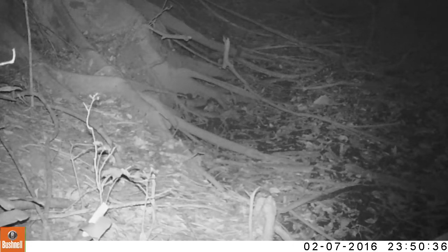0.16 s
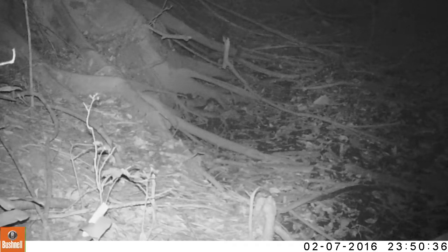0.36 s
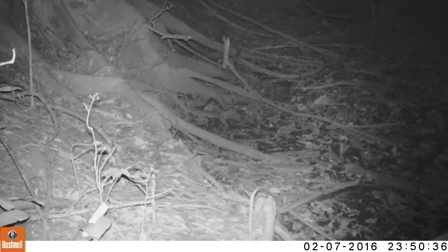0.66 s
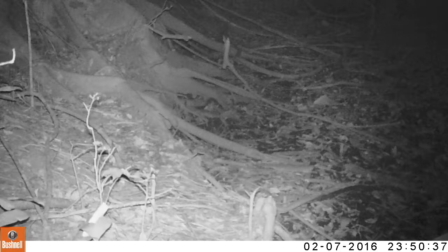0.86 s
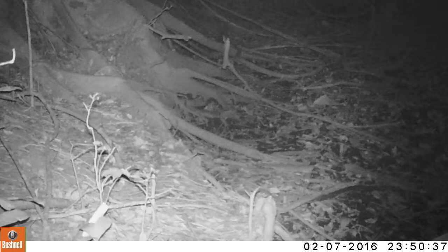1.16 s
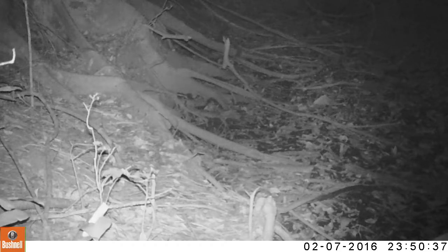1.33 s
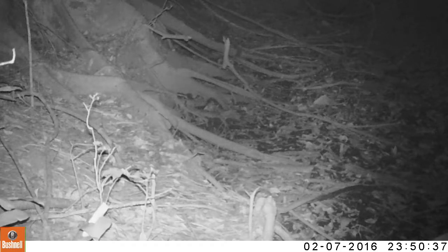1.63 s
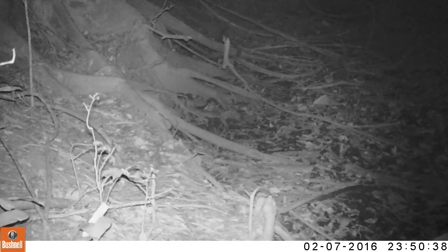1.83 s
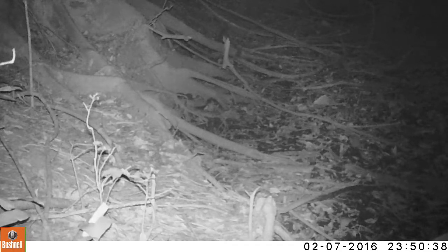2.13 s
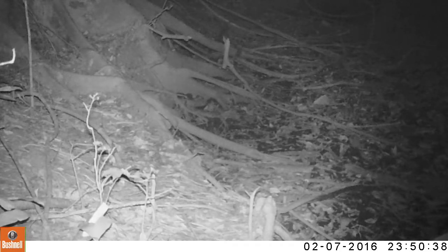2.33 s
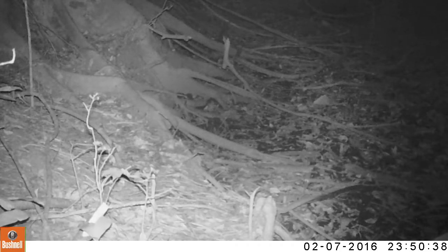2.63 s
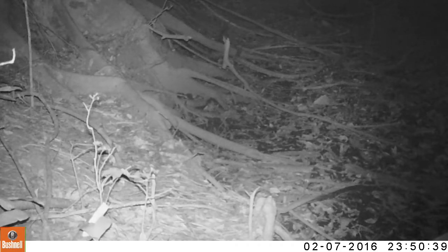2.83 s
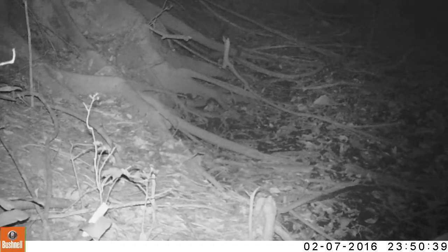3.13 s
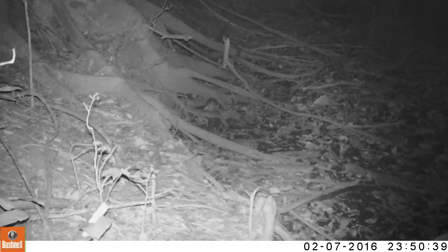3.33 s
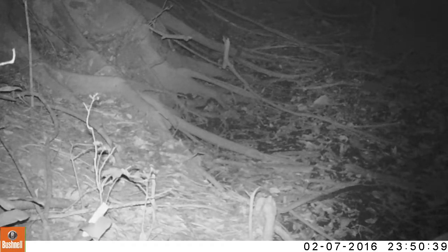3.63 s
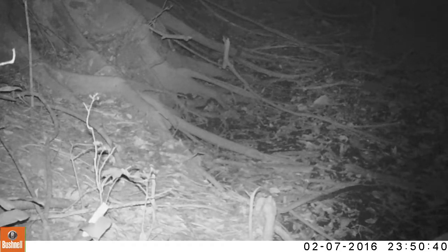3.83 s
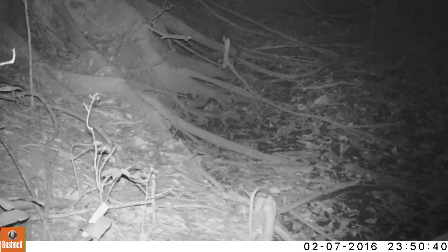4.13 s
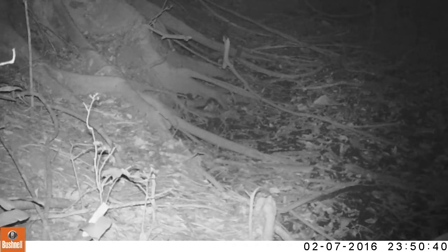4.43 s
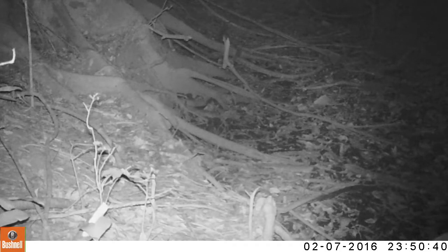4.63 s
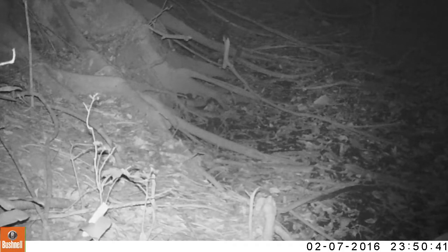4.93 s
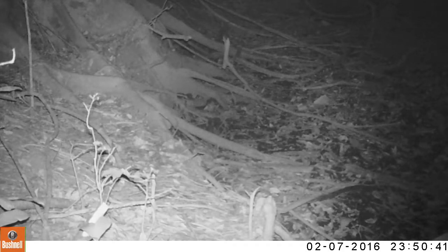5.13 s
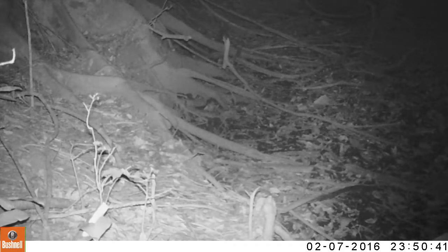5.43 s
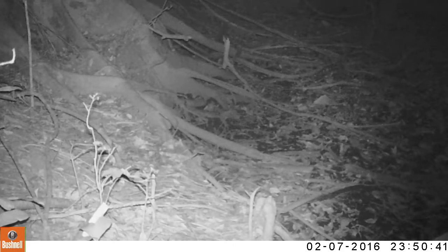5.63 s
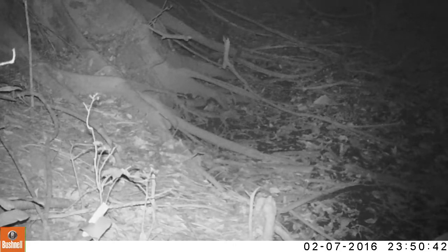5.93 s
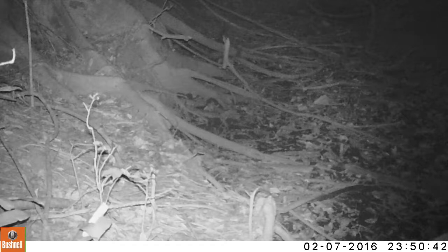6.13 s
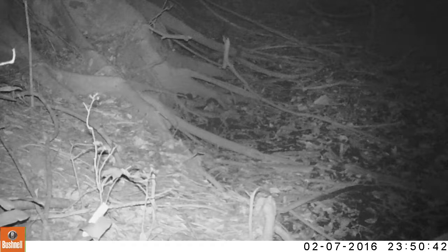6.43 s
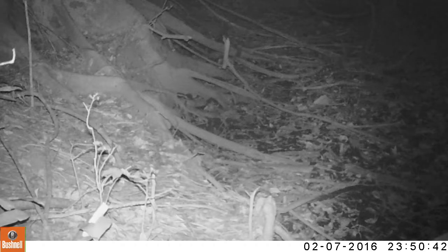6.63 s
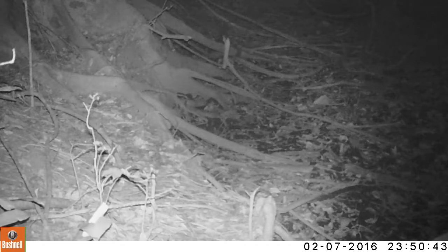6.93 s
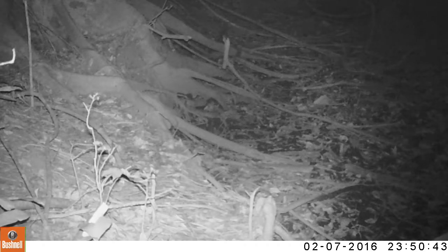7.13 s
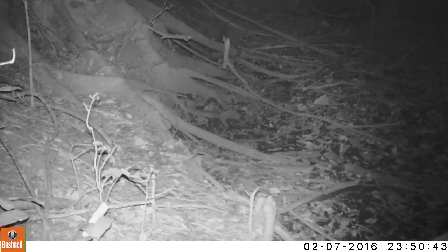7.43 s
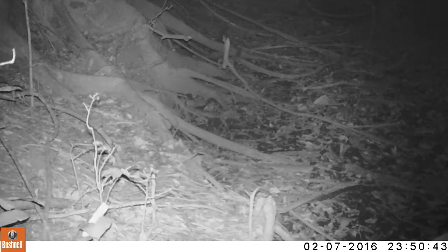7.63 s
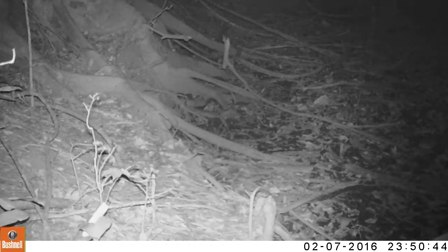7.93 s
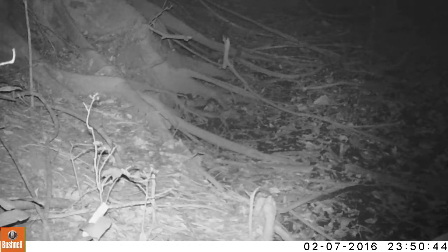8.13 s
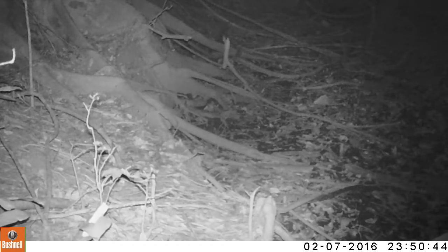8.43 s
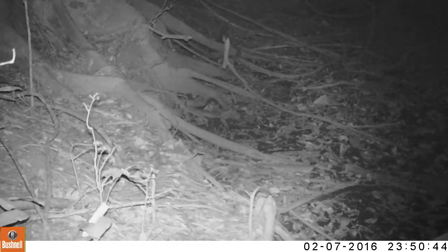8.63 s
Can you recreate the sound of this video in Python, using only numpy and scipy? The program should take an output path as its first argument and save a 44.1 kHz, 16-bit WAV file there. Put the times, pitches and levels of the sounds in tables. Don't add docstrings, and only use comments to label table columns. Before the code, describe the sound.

Night in a forest, among roots and fallen leaves, picked up quietly by a small, hissing microphone. From 0 to about 9 seconds a tree cricket trills without a break, around fifteen low, rising strokes a second near two kilohertz, with a fainter neighbour and soft reflections off trunks. A nearer katydid shrills in a fast, high, falling rasp until about 2.5 seconds, then stops quickly; distant katydids carry on as a blurred shimmer, growing slightly towards the end. Far buzzers hold steady, humming lines in the middle treble. Small crickets give nearly pure, high trills under half a second long, taking turns and overlapping; the strongest sings at about 0.2, 1.3, 2.2 and 3.1 seconds, and others continue. Leaves stir very faintly at 1.1, a little more at 6.9 with slow settling, and again at 8.2. Low, steady hiss lies beneath.

```python
import sys
import numpy as np
from scipy import signal
from scipy.fft import rfft, irfft, next_fast_len
from scipy.io import wavfile

SR = 44100
rng = np.random.default_rng(int(sys.argv[2]) if len(sys.argv) > 2 else 0)


def undo_db(level):
    steps = np.asarray(level, float) / 20
    return 10 ** steps


def dump_mix(stems):
    frames = np.atleast_2d(stems).T
    limited = np.clip(frames, -1, 1)
    pcm = np.round(limited * 32767).astype(np.int16)
    wavfile.write(sys.argv[1], SR, pcm)


N = 386316
TIME = np.arange(N) / SR

# (time after its start [s], pitch [Hz], level [dB])
TREE_STROKE = [
    (.004, 1893, -16.5),
    (.008, 1920, -1.5),
    (.014, 1972, 1),
    (.021, 2046, 1.5),
    (.028, 2118, 2.5),
    (.036, 2142, 0),
    (.040, 2132, -14),
    (.043, 2100, -36),
]
# (time [s], strokes done [count])
TREE_BEAT = [(-0.072, 0), (2.9004, 44), (5.8705, 88), (8.8382, 132)]
# (delay [s], level [dB])
TREE_ECHOES = [(.013, -23.5), (.021, -17), (.034, -16), (.052, -27)]
TREE_DB = -53.5

# (time after its start [s], pitch [Hz], level [dB])
KATYDID_STROKE = [
    (0, 6460, -30),
    (.0014, 6347, 1),
    (.0030, 6137, 1.5),
    (.0046, 5977, -11),
    (.0056, 5935, -1.5),
    (.0068, 5847, 0),
    (.0085, 5636, -13),
    (.0098, 5455, -43),
]
# (time [s], level [dB])
NEAR_KATYDID = [
    (0, -50),
    (2.5, -51),
    (2.62, -75),
    (8.76, -94),
]
# (time [s], level [dB])
FAR_KATYDIDS = [(2.75, -61), (8.7, -58)]
NEAR_KATYDID_RATE = 53.245

# (mean pitch [Hz], stroke rate [1/s], pitch sweep [Hz], level [dB])
BUZZERS = [(4205, 138.9, 160, -74), (4345, 125.0, 30, -77), (3927, 78.0, 50, -80), (4269, 139.5, 60, -78),
           (4181, 137.0, 150, -74), (4218, 127.0, 60, -73), (4101, 140.4, 170, -74),
           (4131, 138.2, 170, -75), (4004, 111.0, 100, -77), (4046, 141.8, 120, -77)]
# (frequency [Hz], level [dB per Hz])
BUZZ_BLUR = [(3700, -28), (3860, -11), (3920, -1.5), (4200, 3.5), (4350, 2.5), (4400, -5.5), (4560, -11.5),
             (4700, -30), (4800, -31), (5000, -58)]
# (time after its start [s], pitch [Hz], level [dB])
HIGH_BUZZ_STROKE = [(0, 4730, -32), (.002, 4660, 1), (.005, 4417, 5.5), (.008, 4406, 5.5), (.010, 4380, -7)]
BUZZ_DB, BUZZ_BLUR_DB, HIGH_BUZZ_DB = -3.5, -68.5, -81

# (frequency [Hz], level [dB per Hz])
HISS = [(12, 0.5), (28, 1.5), (60, -4), (110, -9.5), (220, -15.5), (500, -24.5), (1000, -32), (1600, -37),
        (2600, -40.5), (3500, -41), (4700, -36.5), (5600, -31.5), (7400, -49.5), (10200, -49.5),
        (11600, -48.5), (14000, -51)]
HISS_DB = -52

# (pitch [Hz], level [dB], trill length [s])
LOUD_CRICKET = (4945, -60.5, .45)
LOW_CRICKET = (4877, -64.5, .37)
LOUD_STARTS = [.23, 1.27, 2.24, 3.10]
LOW_STARTS = [.05, .75, 1.47, 2.35, 3.40, 4.33, 5.20, 5.96, 6.74, 7.85, 8.55]
# (pitch [Hz], level [dB], trill length [s], first start [s], time between starts [s])
EVEN_CRICKETS = [(4963, -70, .36, 2.02, .915), (4911, -72, .3, 2.9, .87), (4837, -73, .38, .3, 1.0),
                 (5051, -72.5, .41, .10, .845), (5228, -78, .3, 3.62, 1.09)]
# (frequency [Hz], level [dB per Hz])
TRILL_BLUR = [(4700, -37.5), (4790, -19), (4830, 2.0), (4900, 3), (4980, 4), (5070, -12), (5110, -19),
              (5200, -44)]
TRILL_RATE, TRILL_BLUR_DB = 22.3, -72

# (frequency [Hz], level [dB per Hz])
LEAVES = [(1500, -16), (3000, 4.5), (5000, -3), (7600, 7.5), (9400, 1.5), (10500, -13), (14000, -25)]
# (time of the peak [s], peak level [dB], fading [dB/s])
STIRS = [
    (1.07, -83, 45),
    (6.88, -77, 30),
    (6.95, -77, 60),
    (7.1, -82, 14),
    (8.2, -82, 30),
]
STIR_RISE_DB_PER_S, STILL_LEAVES_DB = 200, -91


def in_time(rows):
    return np.interp(TIME, *np.transpose(rows))


def drift(rate):
    knots = rng.standard_normal(int(N / SR * 40) + 400)
    r = np.exp(-2 * np.pi * min(rate, 19) / 40)
    slow = signal.lfilter([1], [1, -2 * r, r * r], knots)[300:]
    return np.interp(TIME * 40, np.arange(len(slow)), slow / slow.std())


def coloured(spectrum):
    hz, db = np.transpose(spectrum)
    grid = np.maximum(np.fft.rfftfreq(N, 1 / SR), 1)
    gain = undo_db(np.interp(np.log(grid), np.log(hz), db))
    noise = irfft(rfft(rng.standard_normal(N)) * gain, N)
    return noise / noise.std()


def strokes(count, rate, stroke, shift_hz=0, uneven_db=1.5, late_s=.0003):
    number = np.floor(count).astype(int)
    luck = rng.standard_normal((number.max() + 2, 3))[number]
    since = (count - number) / rate - late_s * luck[:, 0]
    s, hz, db = np.transpose(stroke)
    pitch = np.interp(since, s, hz) + shift_hz
    phase = 2 * np.pi * (np.cumsum(pitch) / SR + 9 * luck[:, 1])
    level = np.interp(since, s, db, left=-90, right=-90) + uneven_db * luck[:, 2]
    return undo_db(level) * np.sin(phase)


def forest(x, wet_db, t60, stir, echoes=(), count=2):
    t = np.arange(SR // 2) / SR
    x = np.r_[x[SR // 2:0:-1], x]
    size = next_fast_len(len(x) + len(t))
    out = x[-N:].copy()
    for delay, db in echoes:
        late = int(delay * SR)
        out += undo_db(db) * x[-N - late:-late]
    fade = undo_db(-60 * t / t60) * np.clip(t / 0.0091, 0, 1)
    for tails in rng.standard_normal((count, 2, len(t))) * fade:
        one, other = irfft(rfft(x, size) * rfft(tails, size), size)[:, len(x) - N:len(x)]
        angle = np.pi * drift(stir)
        mixed = one * np.cos(angle) + other * np.sin(angle)
        out += undo_db(wet_db) * mixed / np.sqrt(count * np.sum(tails ** 2) / 2)
    return out / np.sqrt(1 + undo_db(2 * wet_db))


def tree_cricket():
    song = strokes(in_time(TREE_BEAT), 14.81, TREE_STROKE, uneven_db=.6, late_s=.0004)
    neighbour = strokes(TIME * 18.0 + .4, 15.3, TREE_STROKE, shift_hz=-10)
    neighbour = undo_db(-17 + 2.0 * drift(0.4)) * neighbour
    return undo_db(TREE_DB) * forest(song + neighbour, wet_db=-6.0, t60=1.0, stir=0.343, echoes=TREE_ECHOES)


def katydids():
    near = strokes(TIME * NEAR_KATYDID_RATE + 0.02, NEAR_KATYDID_RATE, KATYDID_STROKE)
    near = undo_db(in_time(NEAR_KATYDID)) * near
    far = 0
    for rate, start, shift in rng.uniform([52, 0, -1], [55.5, 1, 1], (14, 3)):
        count = TIME * rate + start + 2 + .3 * drift(.3)
        far = far + strokes(count, rate, KATYDID_STROKE, shift_hz=-80 + 110 * shift)
    far = forest(far, wet_db=-6.0, t60=1.0, stir=1.48, count=3)
    near = forest(near, wet_db=-0.5, t60=0.55, stir=1.97)
    return near + undo_db(in_time(FAR_KATYDIDS) + 0.96) * far / far.std()


def buzzers():
    out = 0
    for hz, rate, sweep_hz, db in BUZZERS:
        turn = 2 * np.pi * rate * TIME
        pitch = hz + 2.385 * drift(1.78) + sweep_hz * np.cos(turn)
        level = undo_db(db + BUZZ_DB - 1.5 + 2.86 * drift(0.72))
        tone = np.sin(2 * np.pi * np.cumsum(pitch) / SR)
        out = out + level * (1 + 1.5 * np.sin(turn)) * tone
    wing_band = signal.butter(5, [3845, 4375], "band", fs=SR, output="sos")
    out = signal.sosfiltfilt(wing_band, out)
    high = strokes(TIME * 51.0 + 0.65 * drift(0.64) + 3, 69.8, HIGH_BUZZ_STROKE)
    out = out + undo_db(HIGH_BUZZ_DB + 3 + 2.0 * drift(0.55)) * high
    return forest(out, wet_db=0.5, t60=0.42, stir=.25) + undo_db(BUZZ_BLUR_DB) * coloured(BUZZ_BLUR)


def hiss():
    return undo_db(HISS_DB) * coloured(HISS)


def trills():
    singers = [(LOUD_CRICKET, LOUD_STARTS), (LOW_CRICKET, LOW_STARTS)]
    for hz, db, length, first, every in EVEN_CRICKETS:
        singers.append(((hz, db, length), np.arange(first, N / SR, every)))
    return [(s, s + length, hz, db) for (hz, db, length), starts in singers for s in starts]


def small_crickets():
    out = np.zeros(N + SR)
    for start, end, hz, db in trills():
        t = np.arange(int((end - start) * SR)) / SR
        turn = t * TRILL_RATE % 1
        luck = rng.standard_normal((40, 2))[(t * TRILL_RATE).astype(int)]
        gate = np.clip(np.minimum(turn / 0.25, (.85 - turn) / 0.11), 0, 1)
        swell = np.clip(np.minimum(t / 0.026, (t[-1] - t) / 0.061), 0, 1)
        pitch = hz + 38 * (turn - .45) + 3.0 * luck[:, 1]
        phase = 2 * np.pi * np.cumsum(pitch) / SR + .55 * luck[:, 0]
        at = max(int(start * SR), 0)
        out[at:at + len(t)] += undo_db(db + 3.0 + 0.5 * luck[:, 1]) * gate * swell * np.sin(phase)
    blur = undo_db(TRILL_BLUR_DB + 1.4 * drift(2.0)) * coloured(TRILL_BLUR)
    return forest(out[:N], wet_db=-7, t60=.7, stir=0.5) + blur


def rustle():
    power = undo_db(2 * STILL_LEAVES_DB)
    for s, db, fade_db in STIRS:
        below_peak = np.where(TIME < s, STIR_RISE_DB_PER_S * (s - TIME), fade_db * (TIME - s))
        power = power + undo_db(2 * (db - below_peak))
    return np.sqrt(power) * undo_db(2.0 * drift(13)) * coloured(LEAVES)


def scene():
    mix = tree_cricket() + katydids() + buzzers() + hiss() + small_crickets() + rustle()
    return mix[None]


def low_pass(x):
    return signal.sosfilt(signal.butter(12, 13910, fs=SR, output="sos"), x)


def record(dry):
    return low_pass(dry)


dry = scene()
out = record(dry)
dump_mix(out)
```